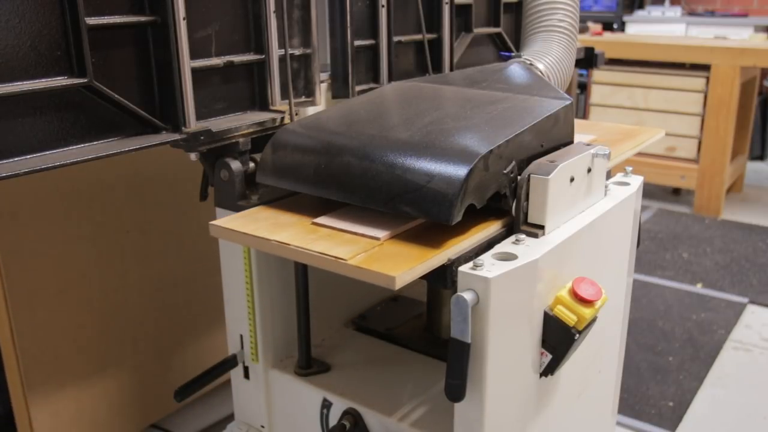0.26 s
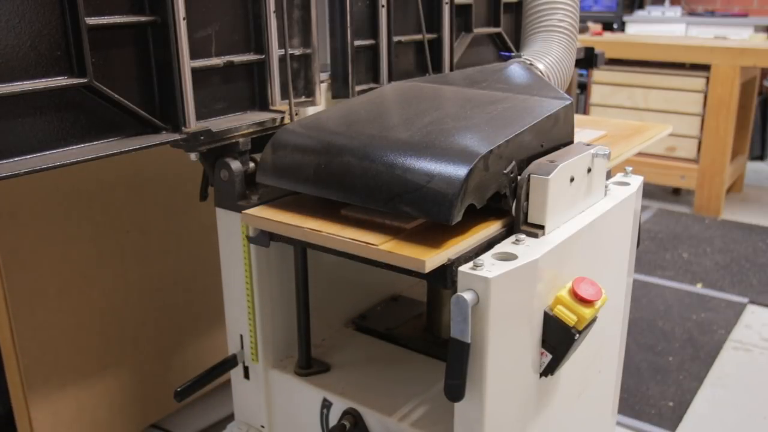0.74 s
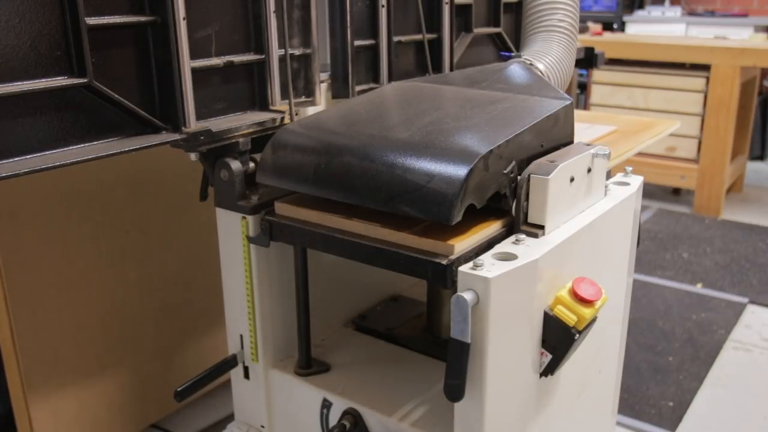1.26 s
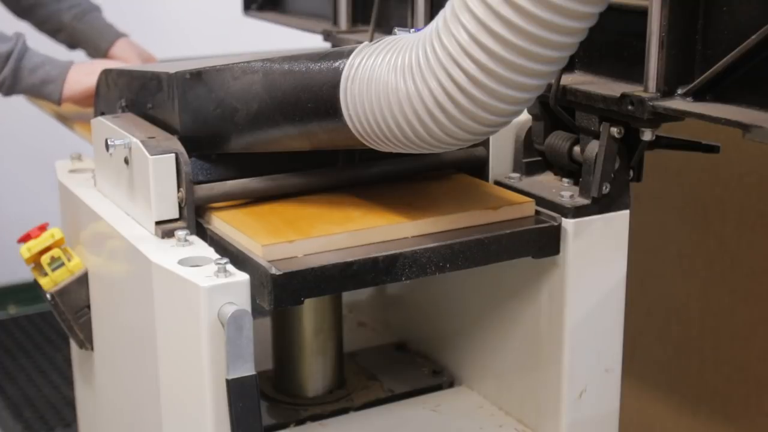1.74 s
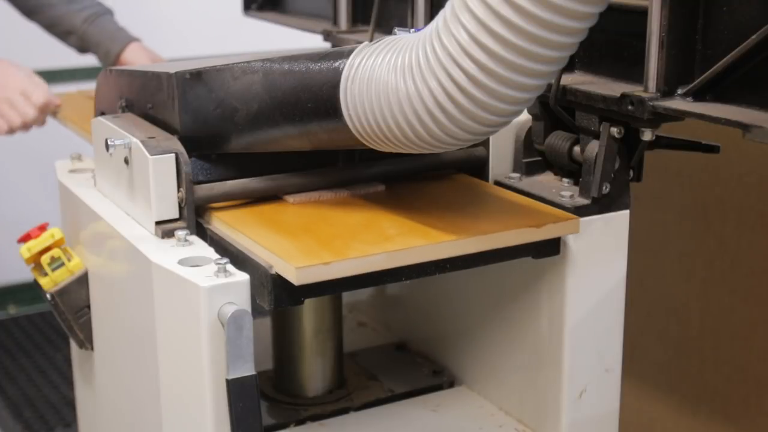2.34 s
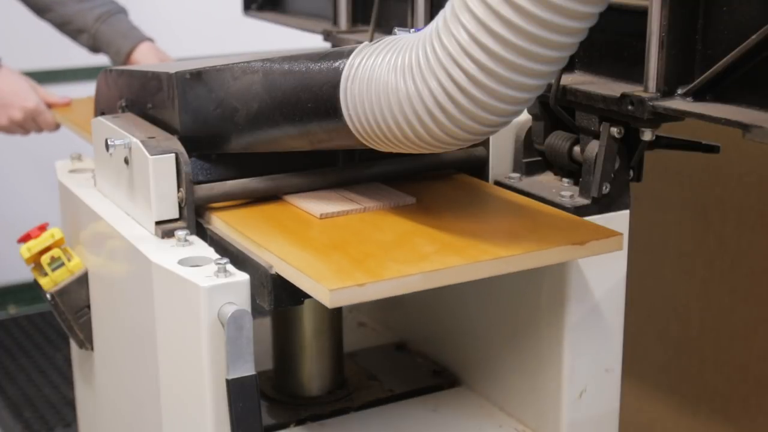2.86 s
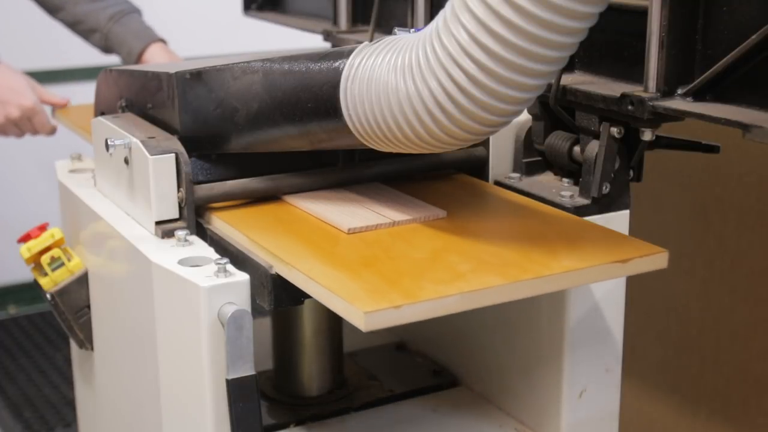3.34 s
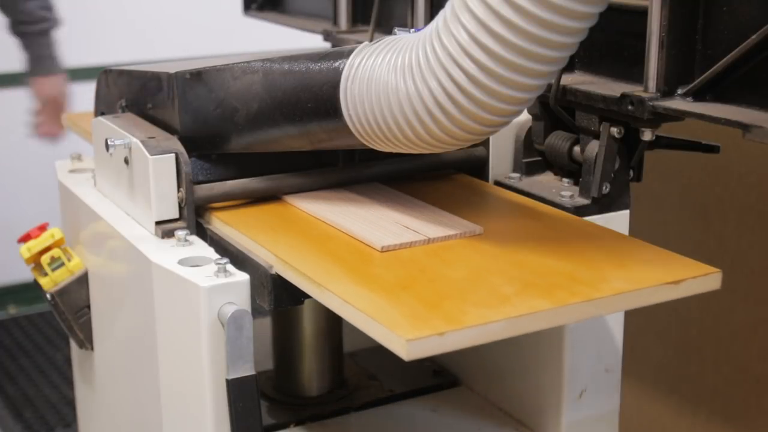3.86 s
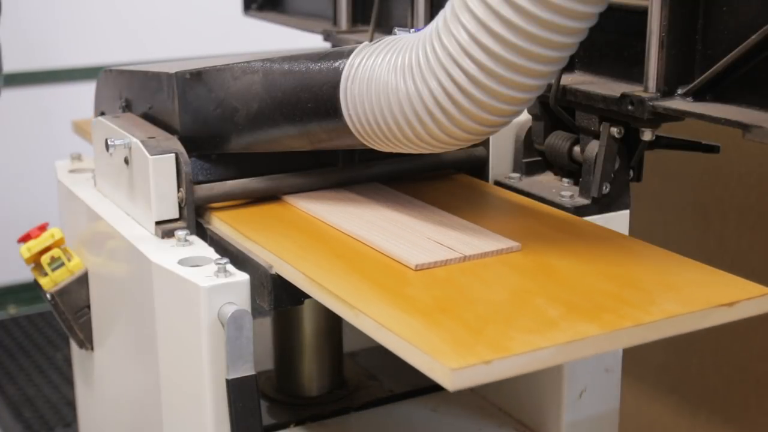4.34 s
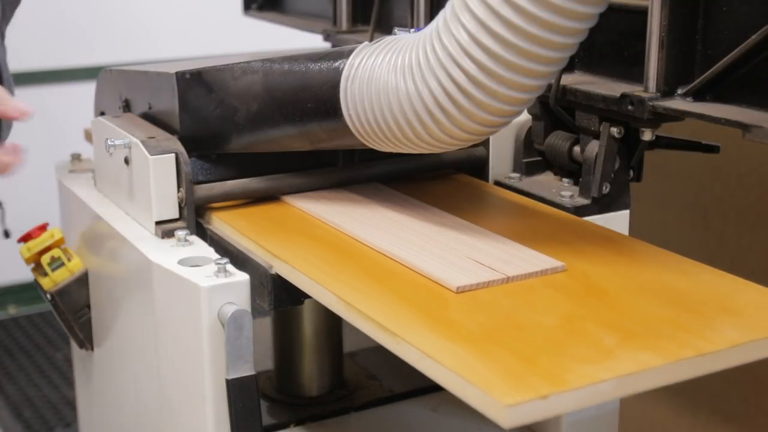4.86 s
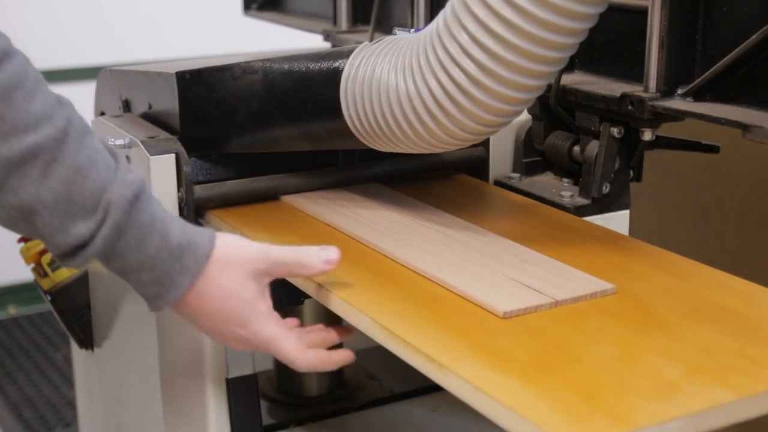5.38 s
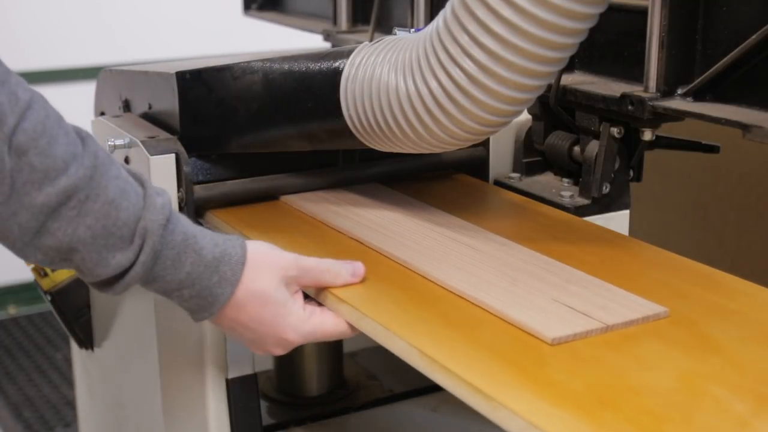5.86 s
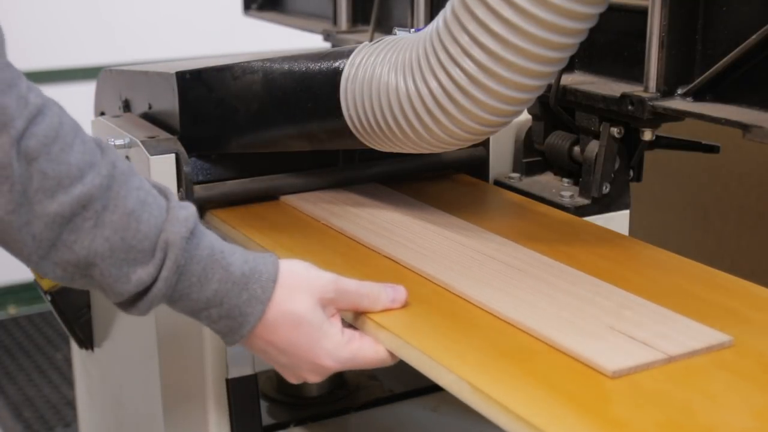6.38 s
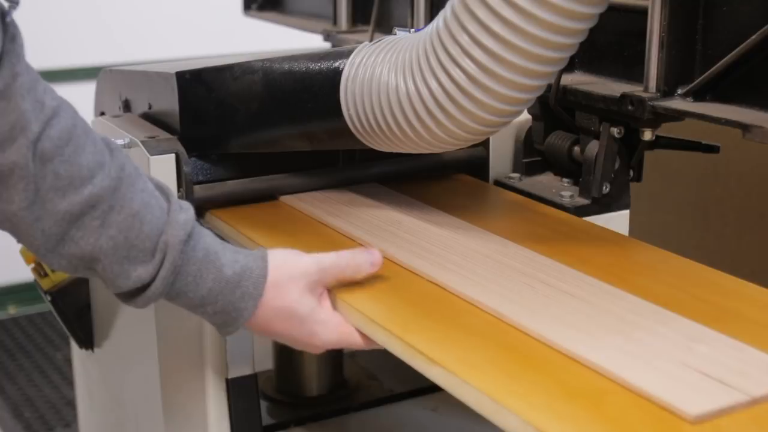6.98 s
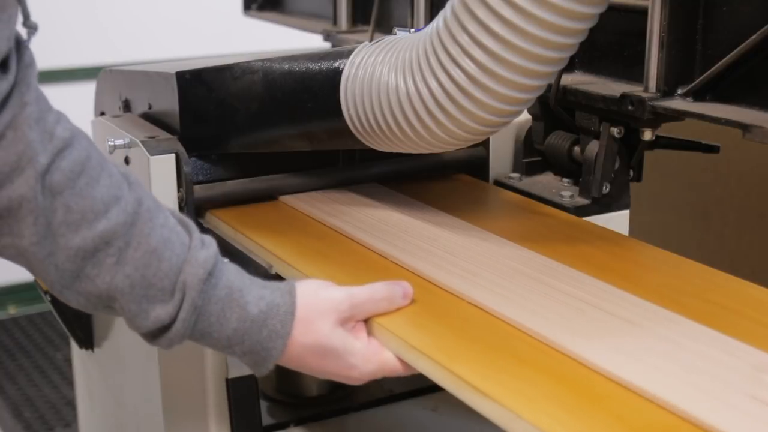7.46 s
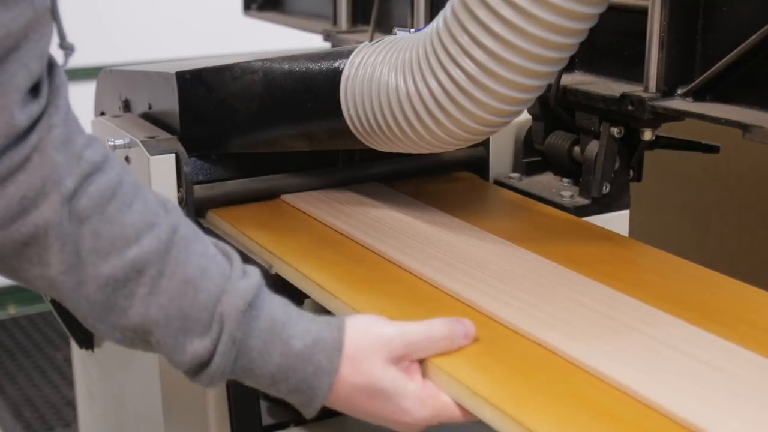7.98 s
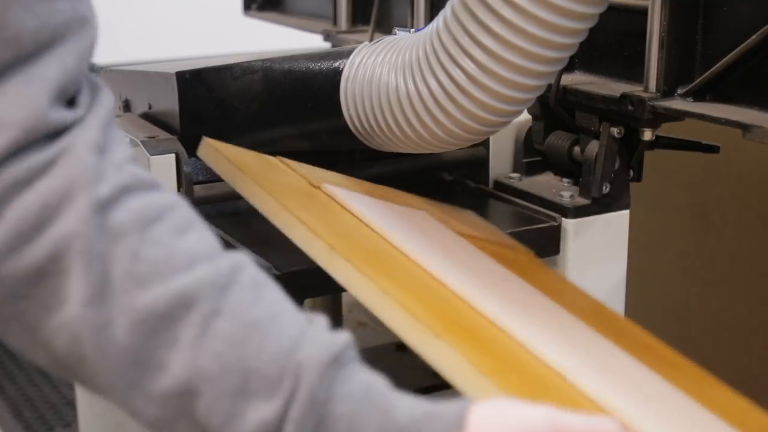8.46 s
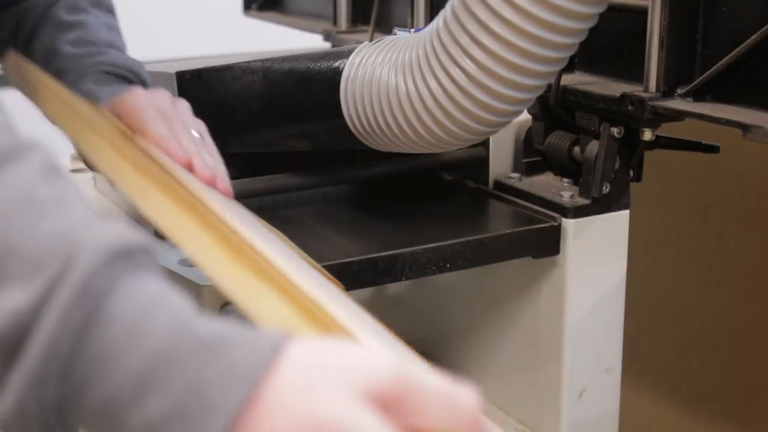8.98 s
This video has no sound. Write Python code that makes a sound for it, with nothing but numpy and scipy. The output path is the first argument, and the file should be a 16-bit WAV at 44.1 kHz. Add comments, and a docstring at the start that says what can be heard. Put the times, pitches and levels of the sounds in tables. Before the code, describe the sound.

In a woodworking shop, a thickness planer shaves a thin wood strip: a steady mid-pitched drone with harsh rasp, bright whine and chip hiss. The perspective jumps from infeed to outfeed with a soft bump, and the whine grows stronger and shifts in colour. A snap and rough chatter end the cut; a short echo fades, the extractor roar rises over a pulsing hum, and wood knocks lightly. Close microphone, automatic level.

```python
"""A thickness planer shaves a thin strip of wood in a workshop, heard first from the infeed, then from the outfeed side.
Four knives strike the wood about 345 times a second: harmonic sines make the drone and whine, impulses the rasp.
Noise gives the bursts of chips and the dust in the hose; short noise bursts are wood knocking on rollers and table.
When the strip runs out, the gain control slowly lifts the noise roar of the dust extractor,
whose fan tone beats with the idling cutter."""
import sys
import numpy as np
from scipy import signal
from scipy.fft import rfft, irfft, next_fast_len
from scipy.io import wavfile
from scipy.ndimage import uniform_filter1d, map_coordinates

SR = 44100
rng = np.random.default_rng(int(sys.argv[2]) if len(sys.argv) > 2 else 0)


def to_wav(sig):
    """Store sig (one row per channel, or 1-D mono) as 16-bit WAV at the path in sys.argv[1].

    Samples outside -1..1 are clipped; the rate is SR.
    """
    pcm = np.clip(np.atleast_2d(sig), -1, 1) * 32767
    pcm = np.round(pcm).astype(np.int16)
    wavfile.write(sys.argv[1], SR, pcm.T)  # frames by channels


N = 406599

MOVE_S = 1.5  # the listening point changes sides
RUN_OUT_S = 7.305  # the strip leaves the knives

# relative depth of cut of each knife: depth (share)
KNIFE_DEPTHS = [1, .5, .55, .1]
# the loose end of the strip chatters as it leaves the knives: start_s, level_db (before cutting force)
LOOSE_END = [(7.0, -80), (7.11, -54), (7.15, -43.5), (7.27, -41.5)]
# colour of that chatter: pitch_hz, level_db (relative, per Hz)
CHATTER_COLOUR = [(700, -22), (1050, -12), (1400, -8), (1750, -3), (2100, -4), (2450, -9), (2800, -5),
                  (3100, 0), (3500, 0), (3800, -1), (4150, 2.5), (4500, -2.5), (5200, -9), (5700, -13),
                  (8000, -14), (12000, -13), (17000, -24)]


def cut_tones(strokes, drone_trim_db=-2, motor_db=-55, linger_db=-5, linger_t60_s=0.46):
    """Drone, whine and loaded motor follow the cutting force; the whine lingers when the knives come free."""
    # the board's drone at the knife rate, on each side: start_s, level_db (before force and trim)
    drone_infeed = [(0, -63), (.9, -48), (1.4, -46)]
    drone_outfeed = [(1.55, -39), (2.43, -37), (2.96, -43), (5.06, -41.5), (5.34, -45.5), (6.51, -39.5),
                     (6.96, -48.5), (7.1, -74)]
    motor_ratio = 1.186  # the loaded motor's tone as a multiple of the knife rate
    echo_dull_hz = 3500  # the whine's echo is dull above this

    side = outfeed()
    front_db = curves(drone_infeed)[0]
    back_db = curves(drone_outfeed)[0] + drone_trim_db
    drone = amp((1 - side) * front_db + side * back_db) * tone(strokes)
    motor = amp(motor_db + 2.1 * wobble(14)) * tone(motor_ratio * strokes)
    tones = whine(strokes)

    # the echo holds each peak of force and lets it decay at the room's rate
    force_db = force()
    fall_db = 60 * clock() / linger_t60_s
    held_db = np.maximum.accumulate(force_db + fall_db) - fall_db
    echo_gain = np.maximum(amp(held_db + linger_db) - amp(force_db), 0)
    echo = echo_gain * filtered(tones, lambda hz: 1 / (1 + (hz / echo_dull_hz) ** 6))
    return amp(force_db) * (drone + motor + tones) + echo


def whine(strokes, wander_db=1.0, flutter_db=1.5, waver_cycles=0.0025):
    """Knife-rate harmonics wander with the grain, the high ones most, and swell with resonance and slaps."""
    # whine on each side: level_db of harmonics 2, 3, 4, .. of the knife rate, before force and resonance
    infeed_harmonics = [-50.5, -52.5, -45, -48.5, -50.5, -52.5, -53.5, -50, -47.5, -55, -63, -57, -60, -66,
                        -66, -66, -66, -62, -66, -66]
    outfeed_harmonics = [-65, -59.5, -61, -53.5, -60, -62, -53, -54.5, -47.3, -54.5, -55.5, -50.5, -58, -60,
                         -60, -63, -52.5, -59, -60, -63]

    side = outfeed()
    rate_hz = np.median(knife_rate())
    loose_db = curves(LOOSE_END)[0]
    out = np.zeros(N)
    for k, (front_db, back_db) in enumerate(zip(infeed_harmonics, outfeed_harmonics), 2):
        held = amp(front_db + side * (back_db - front_db) + lift(k * rate_hz))
        slap = amp(loose_db + along(CHATTER_COLOUR, k * rate_hz))
        grain = amp(wander_db * wobble(3.273) + flutter_db * wobble(30))
        size = grain * np.sqrt(held ** 2 + slap ** 2)
        out += size * tone(k * (strokes + waver_cycles * wobble(40)) + rng.random())
    return out


def lift(hz):
    """dB that the strip's resonances add at one frequency; each swells, glides and fades."""
    # resonances glide as the strip's free lengths change:
    # start_s, length_s, from_hz, to_hz, lift_db (at the peak)
    glides = [(0.503, 1.02, 970, 990, 6), (0.504, 0.61, 3130, 3070, 2), (1.497, 0.3, 700, 680, 8.5),
              (1.492, 0.084, 1400, 1360, 13), (1.483, 0.18, 1740, 1730, 6), (1.482, .2, 2140, 2110, 20.5),
              (1.658, 0.17, 1790, 1750, 11.5), (1.652, 0.18, 2190, 2070, 16), (1.68, 0.41, 3840, 3860, 6),
              (1.8, 0.22, 2830, 2730, 9.5), (1.794, .7, 1390, 1330, 9.5), (1.825, 0.054, 1760, 1690, 13),
              (1.837, 0.43, 2230, 2230, 21.5), (1.85, 1.74, 4420, 4340, 3), (1.9, 0.21, 4800, 4800, 9.5),
              (2.093, 0.57, 1840, 1680, 10.5), (2.35, 0.67, 3180, 3100, 6), (2.5, 1.1, 6500, 6200, 5.5),
              (2.65, 0.59, 1070, 1020, 5), (2.6, 3.4, 3730, 3750, 5.5), (2.75, 0.79, 2800, 2730, 5),
              (2.8, 1.3, 1460, 1380, 10.5), (3.2, 1.03, 2470, 2390, 8.5), (3.8, 0.9, 4510, 4460, 1.5),
              (3.753, 0.36, 700, 680, 3), (4.3, .8, 1420, 1350, 7.5), (4.355, 0.74, 680, 700, 6),
              (4.45, 0.83, 1760, 1700, 6.5), (4.43, 2.7, 2620, 2010, 15.5), (4.6, .75, 2790, 2740, 0),
              (5.0, 2.5, 1110, 970, 6.5), (5.249, 1.44, 1390, 1400, 9), (5.256, 4.3, 670, 705, 9.5),
              (5.55, 1.2, 2800, 2730, 7), (5.6, .5, 1740, 1710, 0.5), (5.55, 1.54, 4300, 3920, 7),
              (5.8, .8, 4510, 4460, 2.5), (6.2, 0.65, 3480, 3430, 4), (6.82, 0.24, 2450, 2500, 17.5),
              (6.84, .24, 2790, 2750, 3), (6.922, 0.31, 1770, 1690, 9.5), (7.132, 0.21, 2720, 2750, 0),
              (7.21, .19, 1400, 1370, 15)]
    width_hz = 266

    t, db = clock()[::64], 0  # slow curve, worked out at every 64th sample
    for s, length_s, from_hz, to_hz, lift_db in glides:
        progress = np.clip((np.minimum(t, RUN_OUT_S) - s) / length_s, 0, 1)
        centre_hz = from_hz * (to_hz / from_hz) ** progress
        detune = (hz - centre_hz) / width_hz
        swell = np.minimum(2 * np.sin(np.pi * progress), 1)
        db = db + lift_db * swell * np.exp(-detune ** 2)
    return np.interp(clock(), t, db)


def cut(strokes, chatter_trim_db=1.0):
    """The rough part of the cut: the infeed side gets more hiss, the outfeed side more rasp."""
    # how much the fibres tear along the strip: start_s, level_db added to rasp and hiss
    tearing = [(0, 0.5), (.5, 0.5), (1.02, 2.6), (1.25, 0.5), (1.5, 2), (1.76, 0.5), (1.84, 0.6), (3.1, .5),
               (4.5, 0.5), (5.65, 0.2), (6.2, 1.3), (6.8, 0.5)]
    # levels before grain and force
    buzz_in_db, buzz_out_db = -43.0, -42.5
    hiss_in_db, hiss_out_db = -44.0, -48.5

    side = outfeed()
    buzz = amp(buzz_in_db + side * (buzz_out_db - buzz_in_db)) * rasp(strokes)
    hiss = amp(hiss_in_db + side * (hiss_out_db - hiss_in_db)) * chips(strokes)
    grain = amp(curves(tearing)[0] + 0.63 * wobble(13))  # harder and softer wood

    # the knives slap the free end unevenly
    unequal = np.array(KNIFE_DEPTHS) - np.mean(KNIFE_DEPTHS)
    slaps = blows(strokes, unequal, jitter_s=2e-5, scatter_db=6.0)
    slaps_in_room = coloured(slaps + 0.42 * shop(slaps), CHATTER_COLOUR)
    chatter = amp(curves(LOOSE_END)[0] + chatter_trim_db) * slaps_in_room
    return amp(force()) * (grain * hollowed(buzz + hiss) + chatter)


def rasp(strokes, ring_t60_s=0.066, direct_db=-2):
    """What the knives differ by buzzes once a turn; wood and hood ring, differently as the strip advances."""
    # colour of the rasp: pitch_hz, level_db (relative, per Hz)
    rasp_colour = [(380, -49), (430, 4.5), (520, -13.5), (900, -16.5), (1150, -4.5), (1550, 3), (2000, 1.5),
                   (2450, -3), (3000, 5), (3400, -1), (4800, -0.5), (7000, 1.5), (9500, -4), (12000, -12),
                   (17000, -27)]
    renew_s = .33  # the advancing strip rings anew after this long

    unequal = np.array(KNIFE_DEPTHS) - np.mean(KNIFE_DEPTHS)
    hits = blows(strokes, unequal, jitter_s=9e-6)
    t, rings = clock(), np.zeros(N)
    age_s = np.arange(SR // 20) / SR
    for s in np.arange(0, RUN_OUT_S + 2 * renew_s, renew_s):
        body = rng.standard_normal(len(age_s)) * amp(-60 * age_s / ring_t60_s)
        near = slice(*np.searchsorted(t, [s - renew_s, s + renew_s]))
        crossfade = np.cos(np.pi / 2 * (t[near] - s) / renew_s)
        ring = signal.fftconvolve(hits[near] * crossfade, body / np.linalg.norm(body))
        rings[near.start:][:len(ring)] += ring
    return coloured(rings - amp(direct_db) * hits, rasp_colour)


def chips(strokes, burst_decay=4):
    """Tearing fibres hiss in a burst after each knife, over the steady rush of flying chips."""
    # colour of the hiss: pitch_hz, level_db (relative, per Hz)
    chip_colour = [(200, -26), (500, -9), (1000, -4.5), (2000, 0), (3300, 1.5), (5000, 0.5), (7500, -4),
                   (10000, -2.5), (11500, -10), (14000, -9), (17000, -21)]
    steady = .55  # share of a burst's height
    burst = np.exp(-burst_decay * (strokes % 1))
    return unit(noise(chip_colour) * (steady + burst))


def blows(strokes, depths, jitter_s, scatter_db=1.9):
    """One sharp band-limited impulse for each knife stroke, sized by the given depths with random scatter."""
    n = np.arange(1, int(strokes[-1]))
    at = (np.interp(n, strokes, clock()) + jitter_s * rng.standard_normal(len(n))) * SR
    size = np.array(depths)[n % len(depths)] * amp(scatter_db * rng.standard_normal(len(n)))
    # a windowed sinc places each blow between samples
    taps = at.astype(int)[:, None] + np.arange(-7, 9)
    lag = taps - at[:, None]
    shape = np.sinc(lag) * np.cos(np.pi * lag / 16) ** 2
    return np.bincount(np.clip(taps, 0, N - 1).ravel(), (size[:, None] * shape).ravel(), N)


def hollowed(x):
    """The low mids drop out while the nose of the strip hangs free, until the outfeed roller grips it."""
    # the hollow: start_s, length_s, centre_hz, half_width_hz
    hollow = (1.57, .23, 1380, 330)
    s, length_s, centre_hz, width_hz = hollow
    progress = np.clip((clock() - s) / length_s, 0, 1)
    depth = np.minimum(2 * np.sin(np.pi * progress), 1)
    return x - depth * filtered(x, lambda hz: np.exp(-((hz - centre_hz) / width_hz) ** 4))


def force(collapse_db_per_s=600):
    """Cutting force in dB; it collapses when the strip runs out."""
    # how hard the knives work: start_s, level_db (relative, before the collapse)
    force_points = [(1.47, 13), (1.55, 16), (2.4, 21), (3.5, 18.5), (6.7, 15.5), (7.27, 19)]
    return curves(force_points)[0] - np.clip(collapse_db_per_s * (clock() - RUN_OUT_S), 0, 90)


def knife_rate(idle_hz=350.0, run_up_s=.44):
    """Strokes per second: held down by the cut, then running up to idle with a time constant."""
    # cutter block under load, on each side: start_s, rate_hz (knife strokes per second)
    speed_infeed = [(0.0, 343.5), (1.096, 342.4), (1.47, 343.7)]
    speed_outfeed = [(1.53, 345.1), (2.17, 344.1), (2.35, 345.0), (6.93, 345.4), (7.22, 345.8),
                     (7.28, 348.2)]
    loaded_hz, = curves(np.vstack([speed_infeed, speed_outfeed]))
    since_s = np.maximum(clock() - RUN_OUT_S, 0)
    return idle_hz + (loaded_hz - idle_hz) * np.exp(-since_s / run_up_s)


def knocks():
    """Wood snaps in the rollers and knocks on the table: short bursts of band-limited, decaying noise."""
    # each knock: start_s, level_db (before the band filter), t60_s, thin_below_hz, dull_above_hz
    knock_list = [(1.79, -5, .018, 1200, 2600), (1.7935, -4, .015, 2000, 4300),
                  (6.8465, -12, .02, 2400, 5000), (6.8505, -9.5, .025, 1700, 5400),
                  (6.858, -12.5, .03, 1900, 6500), (6.87, -10, .02, 1900, 3100),
                  (6.892, -9, .02, 2000, 3100), (7.838, -37, .088, 700, 4500),
                  (8.158, -18, .025, 550, 3100), (8.166, -28, .03, 400, 1700), (8.174, -18, .13, 120, 450),
                  (8.33, -34.5, .33, 400, 2900)]
    # colour of the wood: pitch_hz, level_db (relative, per Hz)
    wood_colour = [(100, -8), (350, 2), (1000, -1), (1700, -1), (2500, 1), (3400, 0), (4800, -3),
                   (12000, -25)]

    out, wood, size = np.zeros(N), noise(wood_colour), SR // 2
    age_s, hz = np.arange(size) / SR, np.fft.rfftfreq(size, 1 / SR)
    for s, db, t60_s, thin_hz, dull_hz in knock_list:
        span = slice(round(s * SR), round(s * SR) + size)
        low_cut = hz ** 4 / (hz ** 4 + thin_hz ** 4)
        high_cut = 1 / (1 + (hz / dull_hz) ** 8)
        burst = irfft(rfft(wood[span]) * low_cut * high_cut, size)
        out[span] += amp(db - 60 * age_s / t60_s) * burst
    return out


def hose(hiss_db=-45, fall_db_per_s=9, flow_db=-26.5, build_db_per_s=4.5):
    """Fine dust hisses in the hose: it builds up through the cut, and the last of it drains away afterwards."""
    # colour of the dust: pitch_hz, level_db (relative, per Hz)
    dust_colour = [(300, -19), (1500, -2.5), (4000, 3), (8000, 3.5), (12000, 0.5), (17000, -11)]
    since_s = clock() - RUN_OUT_S
    level_db = np.where(since_s < 0, flow_db + build_db_per_s * since_s, hiss_db - fall_db_per_s * since_s)
    return amp(level_db) * noise(dust_colour)


def idle(strokes, cutter_db=-37.5, fan_db=-40, cutter_octave_db=-48, fan_octave_db=-46,
         air_db=-36.5, fan_near_db=1, hum_in_db=-5):
    """Cutter and fan hum a few hertz apart over roaring air; the fan is louder on the infeed side."""
    # fan and cutter swell together, on the infeed and on the outfeed side: start_s of each
    in_step = (.61, 8.84)
    # tones of motors and ducts: pitch_hz, level_db (before wavering and the infeed cut)
    hum_tones = [(50, -70), (105, -55.5), (146, -61), (226, -69), (279, -50.5), (401, -71), (477, -53.5)]
    # colour of the air: pitch_hz, level_db (relative, per Hz)
    air_colour = [(25, -46), (38, -34), (50, -31), (75, -8.5), (110, -12), (250, 2.5), (420, 1.5),
                  (700, -1), (1300, -5), (2000, -11), (3200, -16), (4600, -20), (9000, -28.5), (17000, -55)]
    fan_hz = 345.3

    t, side = clock(), outfeed()
    front, back = np.interp(in_step, t, strokes - fan_hz * t) % 1  # fan phases that meet the cutter's
    fan = fan_hz * t + front + side * (back - front)
    near = amp(fan_near_db * (1.0 - side))
    blades = amp(cutter_db) * tone(strokes) + near * amp(fan_db) * tone(fan)
    octaves = amp(cutter_octave_db) * tone(2 * strokes) + amp(fan_octave_db) * tone(2 * fan)

    hum = np.zeros(N)
    for hz, db in hum_tones:
        hum += amp(db + 1.6 * wobble(5.0)) * tone(hz * t + 0.075 * wobble(5.0))
    air = amp(air_db + 0.4 * wobble(9)) * noise(air_colour)
    return blades + octaves + amp(hum_in_db * (1 - side)) * hum + air


def bump(bump_db=-23, lead_s=0.0057, length_s=.0025, dull_hz=400):
    """A soft low bump, a low-passed pulse, as the listening point changes sides."""
    u = np.maximum(clock() - MOVE_S + lead_s, 0) / length_s
    pulse = (u > 0) * (1 - u) * np.exp(-u)
    return amp(bump_db) * filtered(pulse, lambda hz: 1 / (1 + 1j * hz / dull_hz))


def shop(x, low_hz=800):
    """The workshop's echo, decaying noise, strongest in the treble that the machine throws at the walls."""
    # decay of the echo: pitch_hz, t60_s
    shop_decay = [(200, 1), (2500, 0.37), (8000, 0.63), (16000, 0.079)]
    hz, t, z = signal.stft(rng.standard_normal(SR // 2), SR, nperseg=256)
    decay = amp(-60 * t / along(shop_decay, hz)[:, None])
    tail = signal.istft(z * decay, SR, nperseg=256)[1]
    delayed = np.pad(tail, (SR // 200, 0))  # 5 ms before the echo starts
    wet = signal.fftconvolve(x, delayed / np.linalg.norm(tail))[:N]
    return filtered(wet, lambda f: f ** 2 / (f ** 2 + low_hz ** 2))


def outfeed():
    """0 on the infeed side, 1 on the outfeed side, with a 20 ms crossfade."""
    return np.clip((clock() - MOVE_S) / 0.02 + .5, 0, 1)


def amp(db):
    """Decibels to gain."""
    return np.exp(np.asarray(db) * (np.log(10) / 20))


def unit(x):
    """Scale to rms 1."""
    return x / np.sqrt(np.mean(x ** 2) + 1e-20)


def clock():
    """The time of each sample in seconds."""
    return np.arange(N) / SR


def along(points, hz):
    """(Hz, value) points read on a log frequency axis."""
    f, v = np.transpose(points)
    return np.interp(np.log(hz + 1), np.log(f + 1), v)


def curves(rows):
    """One value per sample for each column after the time."""
    s, *cols = np.transpose(rows)
    return [np.interp(clock(), s, c) for c in cols]


def wobble(rate):
    """A smooth random curve, rate knots a second."""
    coarse = clock()[::32]
    knots = rng.standard_normal(int(coarse[-1] * rate) + 4)
    return np.interp(clock(), coarse, map_coordinates(knots, [coarse * rate]))


def tone(cycles):
    """A sine of rms 1."""
    return np.sqrt(2) * np.sin(2 * np.pi * cycles)


def filtered(x, response):
    """x times a response of frequency."""
    m = next_fast_len(N + SR // 2)
    return irfft(rfft(x, m) * response(np.fft.rfftfreq(m, 1 / SR)), m)[:N]


def coloured(x, spectrum):
    """x shaped by a spectrum, at rms 1."""
    return unit(filtered(x, lambda hz: amp(along(spectrum, hz))))


def noise(spectrum):
    """Fresh noise of rms 1, shaped by a spectrum."""
    return coloured(rng.standard_normal(N), spectrum)


def scene(room_db=-6, unsteady=.0012):
    """The cutter's slightly unsteady turning (a share of its speed) drives both the cut and the idle hum."""
    strokes = np.cumsum(knife_rate() * (1 + unsteady * wobble(35))) / SR
    work = cut(strokes) + knocks()
    room = amp(room_db) * shop(work)
    return (cut_tones(strokes) + work + room + hose() + idle(strokes) + bump())[None]


def record(dry, limit_db=-39.5, slope=0.87, release_db_per_s=12.0, window_s=0.22, sense_hz=600, top_hz=17100):
    """Gain control, sensing mostly above sense_hz, ducks under the whine and recovers slowly; then a band limit."""
    x, t = dry[0], clock()
    sensed = filtered(x, lambda hz: hz ** 2 / (hz ** 2 + sense_hz ** 2))
    power = np.abs(uniform_filter1d(sensed ** 2, int(window_s * SR)))
    level_db = 10 * np.log10(power + 1e-12)
    over_db = slope * np.maximum(level_db - limit_db, 0)
    duck_db = np.maximum.accumulate(over_db + release_db_per_s * t) - release_db_per_s * t
    return filtered(x * amp(-duck_db), lambda hz: hz < top_hz)[None]


dry = scene()
out = record(dry)
to_wav(out)
```